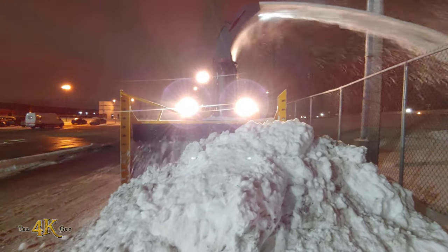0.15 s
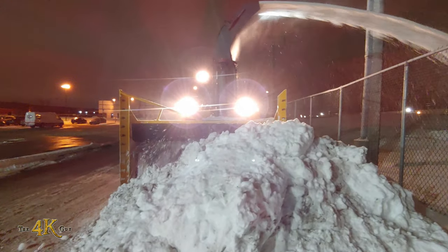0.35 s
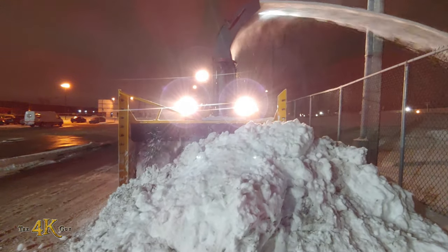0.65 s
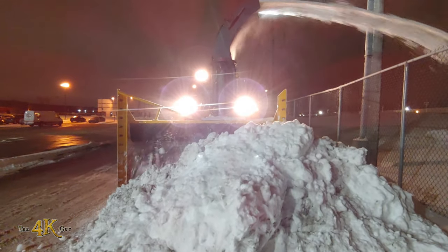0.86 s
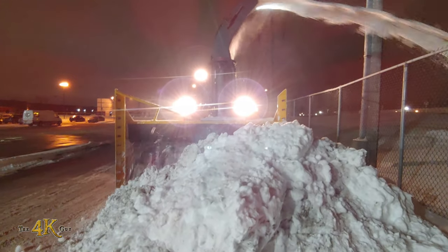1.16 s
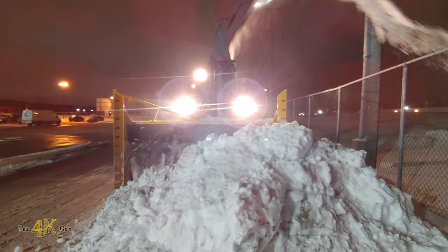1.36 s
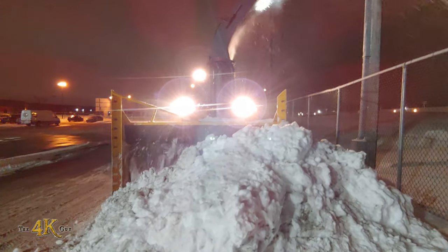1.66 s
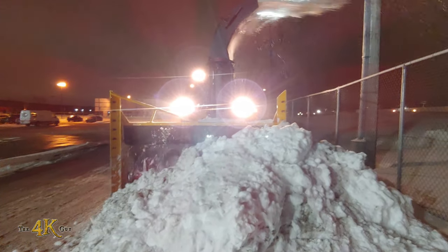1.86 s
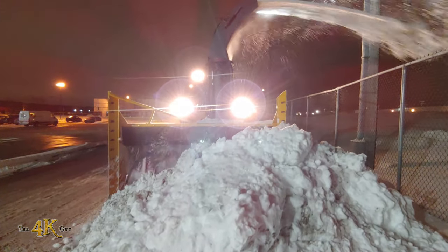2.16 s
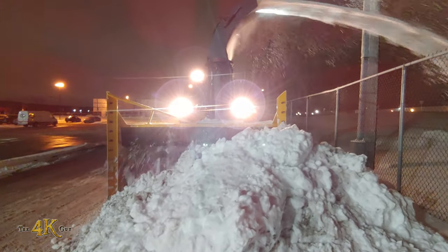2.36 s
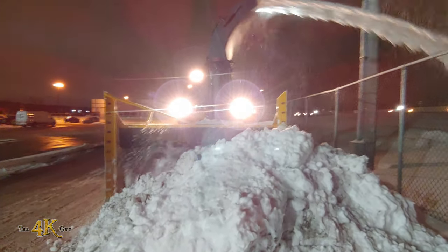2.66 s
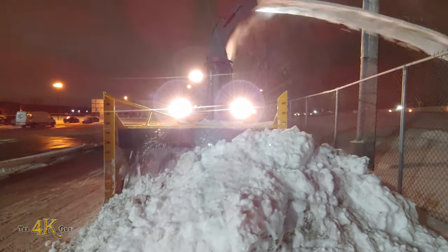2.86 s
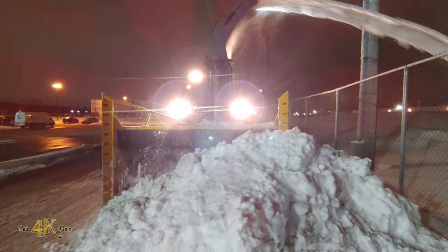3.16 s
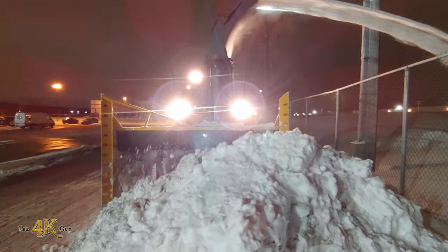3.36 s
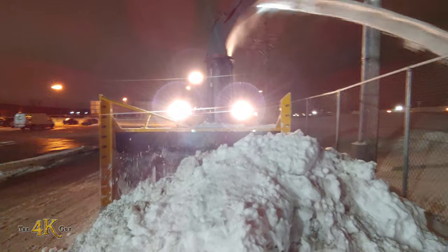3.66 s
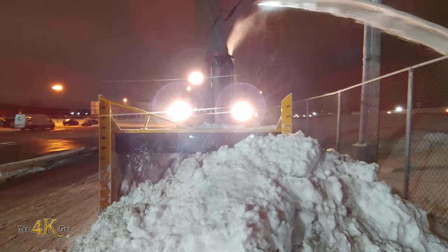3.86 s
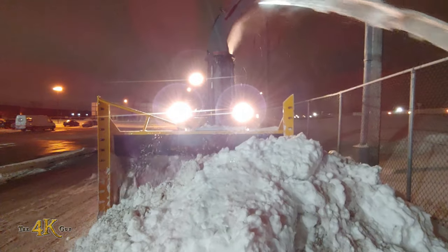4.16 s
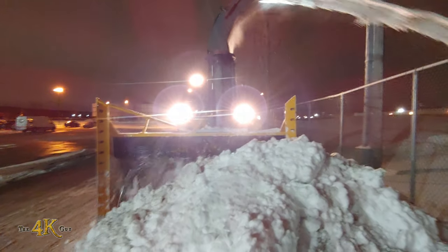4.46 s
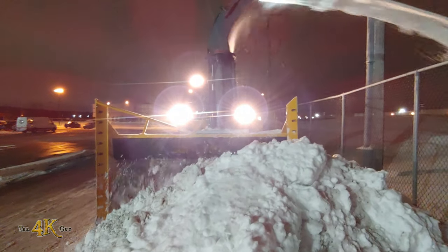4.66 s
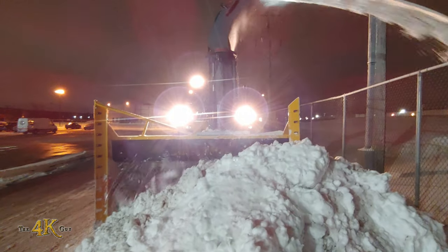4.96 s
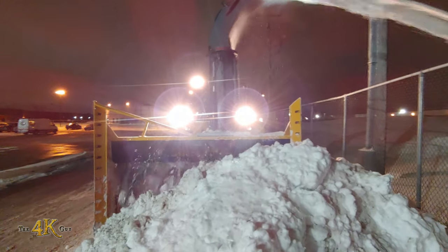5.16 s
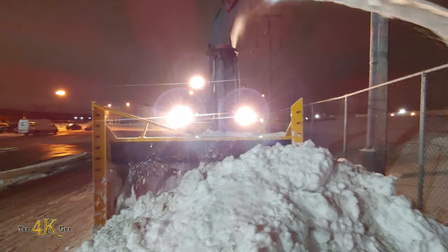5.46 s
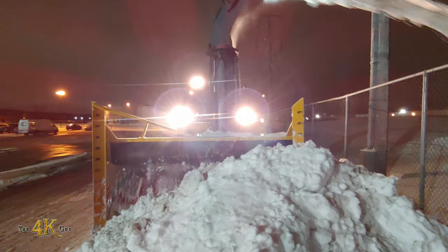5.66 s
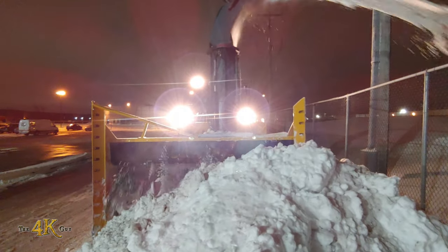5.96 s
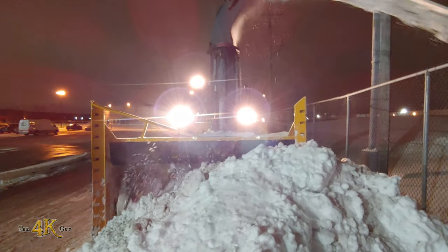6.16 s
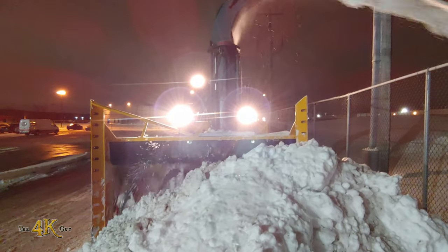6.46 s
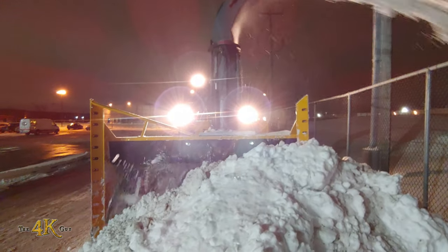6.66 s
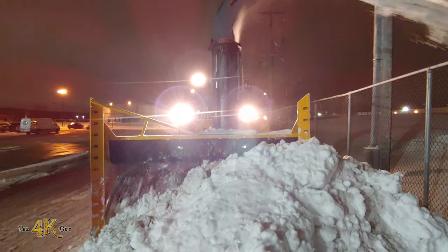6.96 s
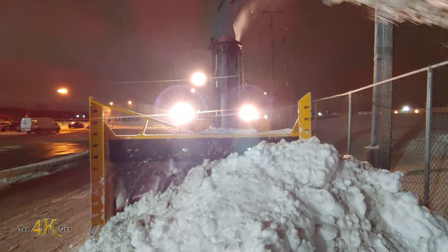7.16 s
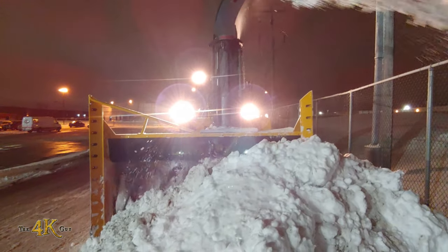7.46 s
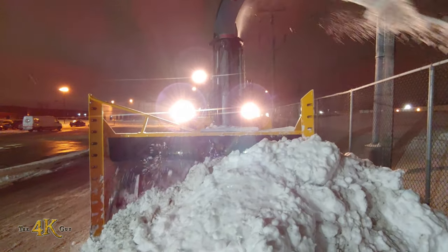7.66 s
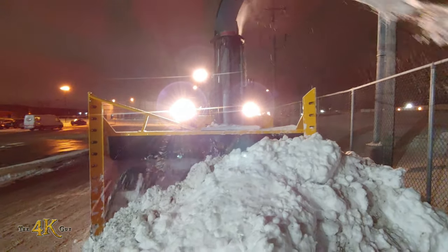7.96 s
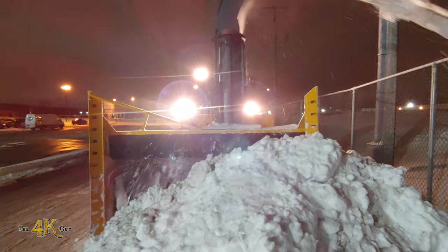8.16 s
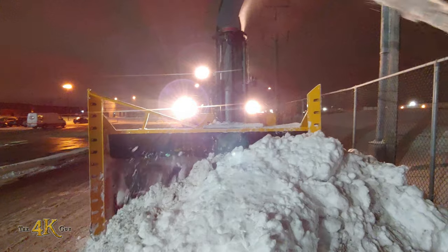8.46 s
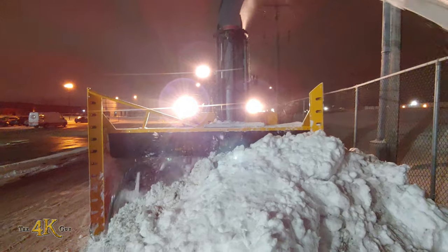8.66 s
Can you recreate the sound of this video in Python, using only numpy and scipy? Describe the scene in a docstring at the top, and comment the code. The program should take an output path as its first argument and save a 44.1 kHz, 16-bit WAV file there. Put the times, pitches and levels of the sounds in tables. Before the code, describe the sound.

A large diesel snowblower works into a snow pile outdoors, heard close in stereo. From the start a loud, deep drone near 100 Hz dominates, slightly left, with low rumble, fine knocking and a heavy rotor throb strongest in the first second. Rough snow churning and bright chute spray continue throughout, beside a left-leaning turbo hiss that is strong at first, eases, then swells around 3 seconds. Gear whine near 800 Hz pulses in and out, clear from 1.6 to 2.6, at 3.2, strongest from 4 to 4.6, and returning after 8. The engine lugs with a shudder around 3 to 3.5. A wavering motor hum sits in the middle. Thin steel singing enters at 2.4, 4.4 and faintly 7.2. A very high whistle drifts downward, rising slightly at the end. Ice rattles sharply about 6.9; spray dips near 8.1, then recovers, still running at about 8.8.

```python
"""A deep diesel drone comes first, under the whine of a gearbox: a snowblower chews into a pile of snow.
The drone, whine and hum are tones locked to one crankshaft; the impeller also throbs once a turn.
Snow churns and sprays as shaped noise, and the turbocharger adds hissing noise and a gliding whistle.
A hydraulic motor hums at a wandering pitch; later, snow rubbing the steel housing sets it singing."""
import sys
import numpy as np
from scipy import signal
from scipy.fft import rfft, irfft, next_fast_len
from scipy.io import wavfile
from scipy.ndimage import uniform_filter1d, minimum_filter1d, map_coordinates

SR = 44100
rng = np.random.default_rng(int(sys.argv[2]) if len(sys.argv) > 2 else 0)


def materialize(psi):
    """Save the field psi as 16-bit PCM at rate SR to the path in sys.argv[1].

    A 1-D psi becomes a single channel; in a 2-D psi each row is a channel.
    """
    bounded = np.clip(np.atleast_2d(psi).T, -1, 1)
    quanta = np.round(bounded * 32767).astype(np.int16)
    wavfile.write(sys.argv[1], SR, quanta)


N = 388521

# Engine speed. Each row: time in seconds, firing rate in Hz (a small wobble is added).
FIRING_RATE = [(0.0, 102.6), (0.83, 103.3), (1.2, 102.4), (1.74, 101.2), (2.7, 100.3), (3.22, 98.8),
               (3.44, 99.6), (4.05, 101.2), (4.41, 101.8), (5.02, 99.7), (5.41, 99.7), (5.78, 100.5),
               (6.22, 100.2), (6.78, 101.6), (6.96, 101.0), (7.41, 100.7), (8.22, 99.8), (8.81, 98.9)]
# Work done on the pile; the spray stands for the engine's load.
# Each row: time in seconds, chute spray in dB, turbocharger hiss in dB (both before trims).
PILE_WORK = [(0.05, -31.5, -25), (1.07, -32, -29.5), (2.28, -31.5, -30.5), (2.69, -28.5, -27.5),
             (3.32, -27.5, -24.5), (3.98, -31, -27.5), (5.24, -30.5, -29.5), (5.31, -31.5, -29.5),
             (6.59, -30.5, -30), (7.8, -31.5, -30.5), (8.09, -35, -34.5), (8.7, -32, -29),
             (8.75, -30, -29.5)]


def amp(db):
    """Decibels are twenty times the logarithm of an amplitude ratio; this returns the ratio."""
    return 10 ** (np.asarray(db) / 20)


def unit(x):
    """Dividing by the root mean square gives a signal of unit power."""
    return x / np.sqrt(np.mean(x ** 2) + 1e-20)


def along(points, hz):
    """Pitch is heard logarithmically, so values are interpolated along log frequency."""
    f, v = np.transpose(points)
    return np.interp(np.log(hz + 1), np.log(f + 1), v)


def curves(rows):
    """Linear interpolation in time: one value per sample for each column after the time."""
    s, *cols = np.transpose(rows)
    return [np.interp(np.arange(N) / SR, s, c) for c in cols]


def swing(rows):
    """Deviation from the mean: how far a table's first curve stands above its average."""
    value = curves(rows)[0]
    return value - value.mean()


def wobble(rate):
    """Band-limited random variation: a smooth curve through normal knots, rate of them a second."""
    knots = rng.standard_normal(int(N * rate / SR) + 4)
    return map_coordinates(knots, [np.arange(N) * rate / SR])


def filtered(x, response):
    """Linear filtering: the spectrum of x is multiplied by a complex response of frequency."""
    m = next_fast_len(N + SR // 2)
    return irfft(rfft(x, m) * response(np.fft.rfftfreq(m, 1 / SR)), m)[..., :N]


def angle(hz):
    """Phase is the time integral of frequency."""
    return 2 * np.pi * np.cumsum(hz) / SR


def tone(phase, db, flutter, rate):
    """Random complex modulation: a line of rms level db whose strength and phase flutter."""
    modulation = 1 + flutter * (wobble(rate) + 1j * wobble(rate))
    line = np.real(modulation * np.exp(1j * (phase + rng.uniform(0, 2 * np.pi))))
    return np.sqrt(2) * amp(db) * line / np.sqrt(1 + 2 * flutter ** 2)


def place(x, left_db, lead_ms):
    """Level and arrival-time differences: left is louder by left_db and earlier by lead_ms."""
    side = np.array([[1], [-1]]) / 2
    lead_s = lead_ms / 10 ** 3
    return filtered(x, lambda hz: amp(side * left_db) * np.exp(2j * np.pi * hz * side * lead_s))


def rush(spectrum, patchy_db):
    """Turbulent noise of rms 1: partly coherent between channels, uneven in time and frequency."""
    # Each row: frequency in Hz, left-right correlation.
    likeness = [(150, 0.91), (500, 0.99), (900, 0.58), (1400, 0.48), (2500, 0.13), (4500, 0.083),
                (6400, 0.27), (8500, 0.27), (12000, .1)]
    z = signal.stft(rng.standard_normal((2, N)), nperseg=512)[2]
    field = uniform_filter1d(rng.standard_normal(z.shape[1:]), size=5, axis=0)
    field = uniform_filter1d(field, size=14, axis=1)
    pair = signal.istft(z * amp(patchy_db * unit(field)), nperseg=512)[1][:, :N]

    def shares(hz):
        """Mid and side gains whose power difference is the left-right correlation."""
        turn = np.arccos(np.clip(along(likeness, hz), -1, 1)) / 2
        return amp(along(spectrum, hz)) * [np.cos(turn), np.sin(turn)]

    mid, side = filtered(pair, shares)
    return unit(np.array([mid + side, mid - side]))


def diesel(crank):
    """Periodic combustion: three firings a turn drone; uneven cylinders add shudder and knock."""
    # Each row: time in seconds, firing tone and its octave in dB, left minus right in dB (before trims).
    exhaust = [(0.03, -10.5, -27, 2.5), (1.13, -8.5, -23.5, 5), (1.15, -8, -24.5, 3), (2.32, -8, -24, 2.5),
               (2.69, -11.5, -22, 4), (3.3, -13, -23, 2), (3.93, -10, -22, 4.5), (5.32, -9.5, -20, 5),
               (6.83, -9.5, -19.5, 3.5), (8.31, -9, -17.5, 5), (8.58, -8, -18, 7.5),
               (8.78, -11, -16.5, 3.5)]
    # The engine lugs on hard-packed snow. Each row: time in seconds, added shudder and knock in dB.
    lugs = [(3.03, -28, -28.5), (3.44, -17, -35)]
    # Knock of the cylinders. Each row: crank order, dB below the knock level, flutter.
    knock_lines = [(16, 1, 0.8), (19, 7.5, 1), (21, 7.5, 0.79), (31, 14, 0.78)]
    # Weaker engine lines. Each row: crank order, level in dB.
    engine_lines = [(1, -32), (4, -35), (5, -40.5), (7, -46), (9, -44), (10, -49.5), (13, -43.5), (14, -47),
                    (96, -53)]
    # Low noise. Each row: frequency in Hz, relative level in dB per Hz.
    rumble_spectrum = [(10, -25), (28, -28), (50, -0.5), (90, 1), (140, -4), (200, -7), (280, -10),
                       (400, -15.5), (800, -66)]
    firing_db, octave_db, left_db = curves(exhaust)
    t = np.arange(N) / SR
    shudder = amp(-34.5 + 2.5 * wobble(4))
    knock_per_load = 1.4  # dB per dB of load
    knock = amp(-41.5 + knock_per_load * swing(PILE_WORK) + 0.67 * wobble(4))
    shudder_s, knock_s = 0.071, 0.13  # half-lengths of a lug, where its swell is 1/e of the peak
    for s, shudder_db, knock_db in lugs:
        shudder = shudder + amp(shudder_db) * np.exp(-((t - s) / shudder_s) ** 2)
        knock = knock + amp(knock_db) * np.exp(-((t - s) / knock_s) ** 2)
    firing = 3 * crank
    drone = np.sqrt(2) * amp(firing_db + 0.1 + 0.55 * wobble(13)) * np.cos(firing)
    drone = drone * amp((left_db + 0.35) * np.array([[1], [-1]]) / 2)
    octave = -np.sqrt(2) * amp(octave_db + 0.6 + 0.93 * wobble(14)) * np.cos(2 * firing)
    lines = shudder * tone(2 * crank, 0, flutter=0.26, rate=12)
    for order, below_db, flutter in knock_lines:
        lines += knock * tone(order * crank, -below_db, flutter=flutter, rate=28)
    for order, db in engine_lines:
        lines += tone(order * crank, db, flutter=0.78, rate=8)
    rumble = amp(-25.5) * rush(rumble_spectrum, patchy_db=2.5)
    drone = place(drone, left_db=-0.5, lead_ms=0.11)
    return drone + place(octave + lines + rumble, left_db=2.0, lead_ms=0.22)


def whine_db():
    """Tooth loading: the mesh level rises as the teeth bear down, holds, and decays on release."""
    # Each row: start in seconds, hold in seconds, level in dB.
    whines = [(0.2, 0.29, -35.5), (1.0, 0.66, -33.5), (1.6, 0.39, -26.5), (2.0, 0.54, -24),
              (2.6, 0.41, -30.5), (3.19, 0.13, -24), (3.55, 0.3, -30.5), (3.978, 0.62, -21.5),
              (5.05, 0.12, -35), (6.447, 0.57, -31.5), (7.05, 0.63, -35), (8.15, 1, -28)]
    attack_s, release_s, rest_db = 0.02, 0.081, -37.5  # time constants, level between whines
    t = np.arange(N) / SR
    power = amp(rest_db) ** 2
    for s, hold, db in whines:
        rise = 1 - np.exp(-np.maximum(t - s, 0) / attack_s)
        fall = np.exp(-np.maximum(t - s - hold, 0) / release_s)
        power = power + (amp(db) * rise * fall) ** 2
    return 10 * np.log10(power)


def gearbox(crank, mesh_db):
    """Gear meshing: 12 teeth a turn excite harmonics that vary with the whine, load and speed."""
    # Harmonics besides the second. Each row: harmonic, level in dB, dB per dB of whine,
    # dB per dB of load, dB per Hz of firing rate, left lead in ms.
    gear_lines = [(1, -38.5, 0.48, 0.9, 1, 0.18), (3, -39, 0.03, 0.7, 1, 0.3), (4, -40, -0.1, 0, 0, 0.37),
                  (5, -44, 0, 0.8, 2.5, 0.39), (9, -42.5, 0.13, 2, -2.8, 0.49)]
    tooth = 12 * crank
    whine, load, speed = mesh_db - mesh_db.mean(), swing(PILE_WORK), swing(FIRING_RATE)
    second = tone(2 * tooth, mesh_db, flutter=0.2, rate=30)
    sound = place(second, left_db=-0.5, lead_ms=0.31)
    for harmonic, db, per_whine, per_load, per_speed, lead_ms in gear_lines:
        # tooth backlash jitters the phase, more so for the higher harmonics
        phase = harmonic * (tooth + 0.066 * wobble(45))
        level_db = db + per_whine * whine + per_load * load + per_speed * speed + 1.9 * wobble(4.6)
        line = tone(phase, level_db, flutter=0.35, rate=40)
        sound += place(line, left_db=-1.1, lead_ms=lead_ms)
    return sound


def impeller(rotor, mesh_db):
    """Rotating unbalance: the snow-laden rotor throbs once a turn and hums at multiples of its speed."""
    # Snow riding on the impeller unbalances it. Each row: time in seconds, throb in dB (before a trim).
    throb = [(0.15, -16), (0.36, -15.5), (0.55, -20.5), (0.63, -15), (1.41, -26), (2.27, -18.5),
             (2.51, -24), (3.25, -19), (4.67, -25), (6.06, -23), (6.1, -31), (8.7, -24)]
    # Each row: rotor order, level in dB, dB per dB of whine, dB per Hz of firing rate, flutter.
    rotor_lines = [(4, -35, 0.45, -3.3, 0.5), (12, -41, 0.3, 3.5, 0.28), (24, -45, 0.6, 5.1, 0.7),
                   (42, -48.5, 0, 1, 0.84)]
    whine, speed = mesh_db - mesh_db.mean(), swing(FIRING_RATE)
    sound = tone(rotor, curves(throb)[0] - 0.8, flutter=0.12, rate=9.2)
    for order, db, per_whine, per_speed, flutter in rotor_lines:
        level_db = db + per_whine * whine + per_speed * speed
        sound += tone(order * rotor, level_db, flutter=flutter, rate=15)
    return place(sound, left_db=1.1, lead_ms=0.2)


def snow(crank, rotor):
    """Amplitude-modulated noise: snow churns and sprays in pulses; hard chunks rattle and decay."""
    # Churning in the housing. Each row: frequency in Hz, relative level in dB per Hz.
    churn_spectrum = [(100, -45), (250, -9), (380, 0), (500, -1.5), (720, 0.5), (1000, -4), (1400, -8.5),
                      (1800, -16.5), (3000, -20), (8000, -72)]
    # Spray up the chute. Each row: frequency in Hz, relative level in dB per Hz.
    spray_spectrum = [(600, -8), (1200, -9), (1800, -6), (2400, 1), (2700, -1), (3500, 3), (4400, 0.5),
                      (5200, 0.5), (6200, 6.5), (7500, -4.5), (9000, -8.5), (11500, -14.5), (15500, -18)]
    # Ice on steel. Each row: frequency in Hz, relative level in dB per Hz.
    ice_spectrum = [(2000, -17), (7000, 0), (11000, -9), (15000, -12)]
    # Ice chunks rattling up the chute. Each row: time in seconds, starting level in dB.
    chunks = [(4.6, -46), (6.9, -23), (6.96, -25)]
    spray_db, churn_db = curves(PILE_WORK)[0], -29.7 + 0.39 * swing(PILE_WORK)
    churn_pulse = 1 + 0.042 * np.cos(2 * crank) + 0.075 * np.cos(rotor)
    churn = unit(rush(churn_spectrum, patchy_db=1.5) * churn_pulse)
    # lumps of snow feed the chute unevenly, each a scatter of smaller clods
    lumps = amp(0.73 * wobble(13) + 0.93 * wobble(150))
    spray = unit(rush(spray_spectrum, patchy_db=1.5) * (1 + 0.016 * np.cos(rotor)) * lumps)
    t = np.arange(N) / SR
    decay_s = 0.13  # time to fall 60 dB
    rattle = sum(amp(db - 60 * np.abs(t - s) / decay_s) * (t > s) for s, db in chunks)
    ice = rattle * rush(ice_spectrum, patchy_db=2)
    low = place(amp(churn_db + 0.49 * wobble(7)) * churn, left_db=1.4, lead_ms=0.15)
    return low + place(amp(spray_db + 6.0) * spray + ice, left_db=1.0, lead_ms=0.512)


def turbo(crank):
    """Pulsed flow and blade passing: air hisses with the firings; blades whistle through a duct."""
    # Turbocharger speed. Each row: time in seconds, blade tone in Hz (a small wobble is added).
    blade_tone = [(0, 11500), (1.45, 10590), (1.72, 10580), (2.0, 10650), (2.9, 10700), (3.7, 10950),
                  (4.37, 10550), (4.6, 10330), (4.9, 10280), (5.45, 10390), (5.85, 10260), (6.3, 10230),
                  (6.75, 10020), (6.95, 9790), (7.55, 9450), (8.15, 9420), (8.81, 9720)]
    # The whistle swells as it crosses the resonances of the intake duct.
    # Each row: blade tone in Hz, whistle level in dB (a wobble is added).
    duct = [(9420, -33), (9520, -38), (9650, -45), (9800, -45), (10050, -40.5), (10260, -33.5),
            (10390, -36), (10470, -42), (10570, -35), (10640, -50), (10760, -40), (10950, -45),
            (11500, -52)]
    # Each row: frequency in Hz, relative level in dB per Hz.
    hiss_spectrum = [(2500, -37), (4400, -17), (5000, -12.5), (5800, -15.5), (6400, -11.5), (7000, -0.5),
                     (7500, 0.5), (8000, -11), (9000, -15), (11000, -24), (15500, -42)]
    firing = 3 * crank
    pulsing = 1 + 0.094 * np.cos(firing) + 0.04 * np.cos(2 * firing) + 0.085 * np.cos(crank)
    hiss_db = curves(PILE_WORK)[1] + 3.5 + 0.4 * wobble(11)
    hiss = amp(hiss_db) * pulsing * rush(hiss_spectrum, patchy_db=1)
    hz, = curves(blade_tone)
    # each exhaust pulse nudges the turbine, which roughens the whistle
    phase = angle(hz + 10 * wobble(18)) + 0.35 * np.sin(firing)
    whistle = tone(phase, along(duct, hz) + 3 * wobble(14), flutter=0.44, rate=46)
    return place(hiss, left_db=10.5, lead_ms=0.48) + place(whistle, left_db=7, lead_ms=0.41)


def hydraulics():
    """Resonance: a motor's hum, sagging in pitch under resistance, is loudest where its mount resonates."""
    # Each row: time in seconds, motor pitch in Hz.
    motor_pitch = [(0.7, 336), (1.2, 378), (1.75, 358), (2.2, 356), (2.6, 369), (3.3, 358), (3.9, 379),
                   (4.35, 347), (4.8, 351), (5.15, 384), (5.6, 386), (6, 342), (6.5, 367), (6.9, 355),
                   (7.55, 374), (7.8, 361), (8.35, 390), (8.81, 380)]
    # Resonance of the mounting. Each row: motor pitch in Hz, hum level in dB (a wobble is added).
    mount = [(335, -53), (346, -34.5), (360, -33), (376, -35), (387, -54)]
    hz, = curves(motor_pitch)
    hum = tone(angle(hz), along(mount, hz) + 2 * wobble(5), flutter=0.35, rate=22)
    return place(hum, left_db=1.5, lead_ms=0.19)


def housing():
    """Friction-driven vibration: rubbing snow sets one narrow steel mode singing, then slowly eases."""
    # Each row: start in seconds, level in dB that the swell approaches while it decays.
    rubs = [(2.42, -40), (4.36, -37), (7.25, -42)]
    attack_s, t60_s = 0.05, 5.4  # rise time constant, time to fall 60 dB
    t = np.arange(N) / SR
    rubbing = np.zeros(N)
    for s, db in rubs:
        age = np.maximum(t - s, 0)
        rubbing += amp(db - 60 * age / t60_s) * (1 - np.exp(-age / attack_s))
    mode_hz = np.full(N, 2385)
    ring = rubbing * tone(angle(mode_hz), 0, flutter=1.3, rate=50)
    return place(ring, left_db=6.0, lead_ms=0.39)


def scene():
    """Superposition with fixed ratios: one crankshaft drives the gears and, slightly faster, the impeller."""
    crank = angle(curves(FIRING_RATE)[0] + 0.12 * wobble(12)) / 3  # three firings a turn
    rotor = 1.029 * crank
    mesh_db = whine_db()
    machine = diesel(crank) + gearbox(crank, mesh_db) + impeller(rotor, mesh_db)
    return machine + snow(crank, rotor) + turbo(crank) + hydraulics() + housing()


def record(dry):
    """Peak limiting and band limiting: smooth gain holds down each channel, then the top is cut."""
    top_hz = 15700
    needed = 1 / np.maximum(np.abs(dry), 1)
    gain = uniform_filter1d(minimum_filter1d(needed, size=301), size=301)
    return filtered(dry * gain, lambda hz: hz < top_hz)


dry = scene()
out = record(dry)
materialize(out)
```